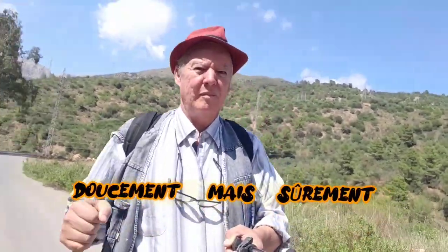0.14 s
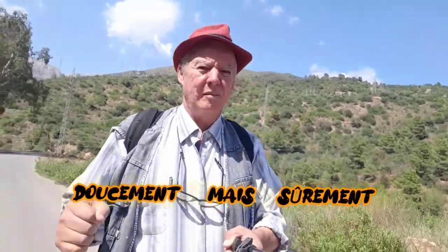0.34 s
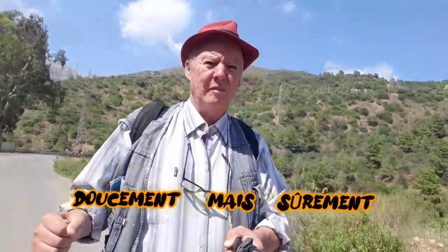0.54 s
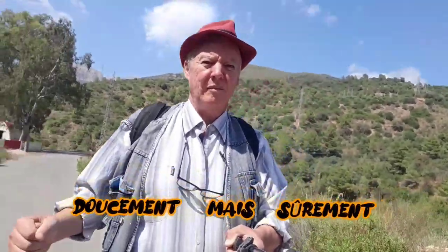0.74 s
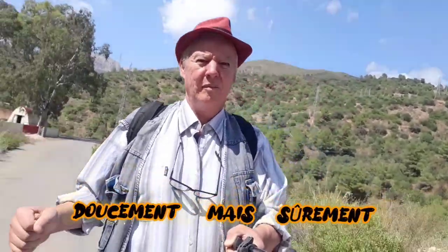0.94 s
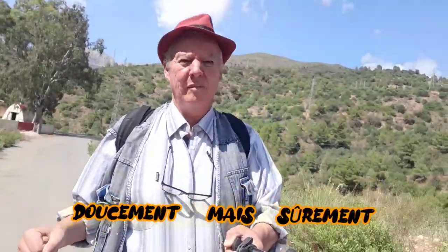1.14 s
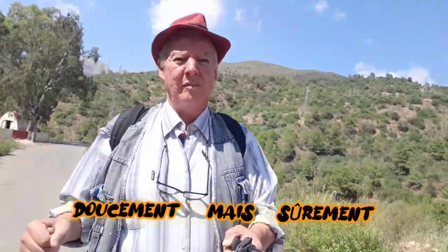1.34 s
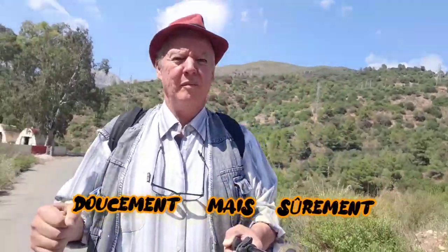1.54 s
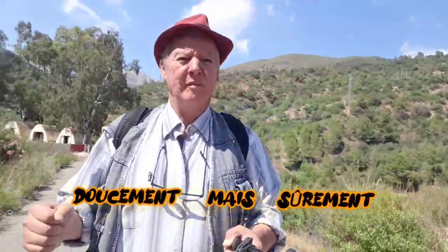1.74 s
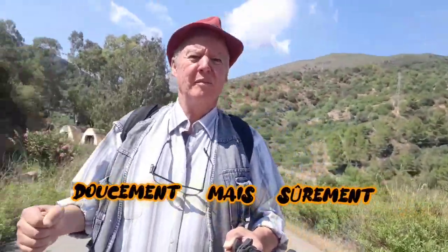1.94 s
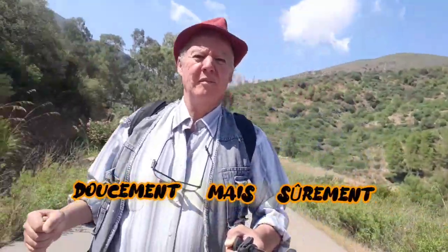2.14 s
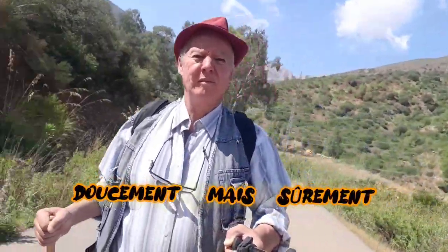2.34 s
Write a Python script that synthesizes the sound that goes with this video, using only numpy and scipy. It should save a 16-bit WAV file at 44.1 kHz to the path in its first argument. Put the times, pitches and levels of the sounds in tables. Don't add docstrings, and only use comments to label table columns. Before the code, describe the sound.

Two hard, gritty walking-stick taps on asphalt, with faint footsteps, wind puffs and a distant engine

```python
import sys
import numpy as np
from scipy import signal
from scipy.fft import rfft, irfft, next_fast_len
from scipy.io import wavfile
from scipy.ndimage import uniform_filter1d, map_coordinates

SR = 44100
rng = np.random.default_rng(int(sys.argv[2]) if len(sys.argv) > 2 else 0)


def wav_record(signal):
    frames = np.transpose(np.atleast_2d(signal))
    bounded = np.clip(frames, -1, 1)
    quanta = np.round(bounded * 32767).astype(np.int16)
    wavfile.write(sys.argv[1], SR, quanta)


def boost(x):
    u = np.asarray(x, float) / 20
    return 10 ** u


N = 110250

# centre in seconds, peak in dB, width in seconds, pitch in Hz.
PUFFS_LEFT = [(0.034, -34, 0.024, 120.6), (0.09, -36.5, 0.067, 103), (0.319, -42, 0.068, 110.7),
              (0.43, -31.5, 0.1, 94), (0.466, -17, 0.092, 104), (0.578, -27.5, 0.046, 115),
              (0.692, -27, 0.06, 104.5), (0.75, -37, 0.0227, 92.7), (0.947, -31, 0.055, 119),
              (1.079, -26.5, 0.036, 104), (1.319, -26.5, 0.11, 116.4), (1.441, -30.5, 0.16, 115),
              (1.493, -26.5, 0.03, 102), (1.535, -32, 0.054, 93.5), (1.728, -25, 0.019, 160),
              (1.887, -22, 0.039, 107), (1.964, -25.5, 0.02, 124), (2.03, -27, 0.048, 93),
              (1.447, -30.5, 0.028, 232)]
# centre in seconds, peak in dB, width in seconds, pitch in Hz.
PUFFS_RIGHT = [(0.284, -28, 0.058, 105.5), (0.389, -34.5, 0.095, 110), (0.537, -52, 0.024, 105.0),
               (0.61, -32, 0.072, 96.6), (0.669, -25.5, 0.046, 90), (0.781, -55.5, 0.022, 105),
               (0.86, -35.5, 0.059, 107), (1.043, -63, 0.041, 107), (1.223, -32, 0.087, 93),
               (1.258, -37, 0.025, 114.0), (1.552, -34.5, 0.177, 100), (1.928, -35.5, 0.058, 104),
               (2.014, -34, 0.044, 101)]
# frequency in Hz, level in dB.
BUFFET_SPECTRUM = [(20, -10), (45, 7), (80, 10.5), (130, -8), (220, -18), (400, -31), (700, -66.5)]
# time in seconds, left level in dB, right level in dB.
BUFFET_LEVELS = [(0, -45, -51), (.5, -39.5, -32), (1.1, -39.5, -46.5), (1.95, -38.5, -43),
                 (2.2, -47.5, -42.5)]
# time in seconds, level in dB, fourth multiple in dB over its mean.
ENGINE_LEVELS = [(0, -48.5, 3), (.3, -43, 1.5), (.7, -44.5, 0.5), (1.1, -47, -8.5), (1.5, -52, 6),
                 (1.62, -58, -3.5), (1.8, -42.5, 3), (2.1, -47, -0.5), (2.5, -47.5, -10)]
# multiple, level in dB, unsteadiness in dB.
ENGINE_ORDERS = [(1, 5.5, 2), (2, -28, -10), (4, -21.5, -0.5)]
# frequency in Hz, density in dB per Hz.
AIR_SPECTRUM = [(200, -5), (330, -9), (620, -26), (2800, -36), (5500, -30.5), (8500, -42.5), (13500, -33),
                (15750, -37.5)]
# frequency in Hz, likeness from 0 to 1.
AIR_LIKENESS = [(200, 0.48), (640, 0.36), (1500, 0.036)]
# start in seconds, length in seconds, first Hz, last Hz, level in dB.
WHISTLES = [(-.01, 0.039, 3240, 2670, -73.5), (0.014, 0.0245, 6210, 3530, -65.5),
            (0.031, 0.026, 3440, 3590, -66), (0.092, 0.037, 3180, 2660, -77),
            (0.294, 0.037, 3400, 4330, -76), (.575, 0.017, 4200, 3950, -77), (.605, 0.015, 3800, 3550, -76),
            (0.955, 0.092, 2620, 4410, -67), (1.091, .045, 3850, 4530, -75.5),
            (1.113, 0.06, 4300, 5450, -75), (1.5, 0.053, 3090, 4570, -67.5),
            (2.399, 0.0592, 2920, 4508, -68.5)]
GLIDE_BENDS = [1.1, .5, 2.1, 1.1, 1.2, 1, 1, 1.9, 2, .39, 1.4, 1.4]
# frequency in Hz, t60 in seconds.
ROADSIDE_DECAY = [(300, 0.47), (2000, 0.379), (8000, 0.38)]
# start in seconds, level in dB, thud in Hz,
# length in seconds.
FOOTFALLS = [(.279, -69, 1010, 0.005), (0.366, -51.5, 486, 0.0023), (0.531, -51, 740, 0.0085),
             (0.962, -51.5, 317.6, 0.021), (1.1803, -40, 280, 0.0032), (1.194, -57, 600, 0.0023),
             (1.813, -53.5, 2460, .003), (1.858, -61, 910, 0.0036), (1.909, -44.5, 320, 0.0044),
             (1.919, -50.5, 414, 0.0067), (1.9193, -43, 815, 0.0017), (2.086, -60.5, 926, 0.0036)]
# frequency in Hz, level in dB.
SCUFF_SPECTRUM = [(250, -2), (800, -4), (2500, -14), (5500, -18.5), (8000, -40), (14000, -37)]
# start in seconds, level in dB, ring in Hz.
STRAP_TICKS = [
    (.7405, -65.5, 7570),
    (0.761, -57.5, 7710),
    (.963, -61, 6420),
    (1.06, -66, 6230),
    (1.097, -65, 7500),
    (1.1808, -53, 1730),
    (1.181, -78, 6200),
    (1.717, -68.5, 7400),
    (1.921, -55.5, 5345),
    (2.216, -68, 6800),
]
# start in seconds, level in dB.
BUCKLE_CLICKS = [
    (0.7608, -52),
    (.964, -60),
    (2.213, -65),
]
# start in seconds, strength in dB, brightness in dB per octave, grit in dB.
TIP_CONTACTS = [
    (.4770, -21, 2.5, -27.5),
    (.4830, -26.5, 0.5, -26),
    (.4872, -24, -1.5, -49),
    (0.4894, -24.5, -2, -44.5),
    (1.762, -28, -2.5, -26),
    (1.7743, -23.5, 2.5, -29),
    (1.7769, -34.5, -2, -26.5),
    (1.7852, -39, -0.5, -41.5),
]
SHAFT_PITCHES = [320, 560, 783, 1265, 1575, 2010, 2410, 2825, 3380, 3800, 4310, 4825, 5410, 6500]
# level in dB, t60 in seconds.
SHAFT_MODES = [(-9.5, 0.092), (-9.5, 0.37), (-8.5, 0.134), (-1, 0.13), (-2, 0.12), (2.5, 0.078),
               (-3.5, 0.0753), (-10, 0.068), (-13, 0.106), (-10, 0.031), (-33, 0.042), (-16.5, 0.0133),
               (-9, 0.01), (-25, .015)]
PLANTED_TIMES = [.494, 1.789]
# frequency in Hz, level in dB.
GRIT_SPECTRUM = [(300, -29), (1500, 17.5), (6000, 7.5), (8000, 7), (16000, -57)]
# start in seconds, level in dB.
STONE_CHIPS = [
    (.4773, -36),
    (.4783, -28),
    (.4806, -36),
    (.4848, -38),
    (1.7607, -34),
    (1.7619, -31),
    (1.7702, -45),
    (1.7748, -35),
    (1.7808, -41),
]
# frequency in Hz, level in dB.
CHIP_SPECTRUM = [(2000, -12), (5000, 0), (7000, -2), (10000, -6), (12500, -13), (16000, -17)]
# centre in seconds, peak in dB, pitch in Hz.
TIP_BLOWS = [
    (.4782, -18, 1900),
    (.4844, -21, 1700),
    (.4885, -14, 1650),
    (.4909, -19, 1800),
    (1.7634, -19, 1300),
    (1.7758, -17, 1900),
    (1.7784, -22, 2200),
    (1.7858, -26, 1500),
]
# time in seconds, level in dB.
ROADSIDE_IMPULSES = [
    (.49, 7.5),
    (1.778, 5.5),
]
# frequency in Hz, level in dB.
ECHO_SPECTRUM = [(400, 4.5), (1400, -2), (3500, -7), (6500, -16), (9000, -12)]
# centre in seconds, level in dB, width in seconds.
CLOTH_SWELLS = [
    (1.0, -73, 0.03),
    (1.53, -72, 0.014),
    (1.67, -72.5, 0.017),
]
# start in seconds, peak in dB, brightness in dB per octave.
GEAR_KNOCKS = [
    (2.444, -33.5, 4.5),
    (2.476, -24.5, 3.5),
]
# frequency in Hz, level in dB, t60 in seconds.
HOLLOW_MODES = [(618, 11.5, 0.026), (906, 8, 0.049), (1180, 7, 0.021), (1577, -2.5, 0.05),
                (2860, -15, 0.023), (2240, -10, 0.029), (3170, -30.5, 0.016), (3950, -19, 0.012)]
# frequency in Hz, level in dB.
PORT_RESPONSE = [(6300, 4), (8000, -14), (12000, -6)]


def unit(x):
    return x / np.sqrt(np.mean(x ** 2) + 1e-20)


def along(points, hz):
    f, v = np.transpose(points)
    return np.interp(np.log(hz + 1), np.log(f + 1), v)


def curves(rows):
    s, *cols = np.transpose(rows)
    return np.array([np.interp(np.arange(N) / SR, s, c) for c in cols])


def wobble(rate):
    knots = rng.standard_normal(int(N * rate / SR) + 4)
    return map_coordinates(knots, [np.arange(N) * rate / SR])


def filtered(x, response):
    m = next_fast_len(x.shape[-1] + 8192)
    return irfft(rfft(x, m) * response(np.fft.rfftfreq(m, 1 / SR)), m)[..., :x.shape[-1]]


def noise(spectrum, size=N):
    return unit(filtered(rng.standard_normal(size), lambda hz: boost(along(spectrum, hz))))


def add(track, s, x):
    i = round(s * SR)
    x = x[max(-i, 0):N - i]
    track[max(i, 0):][:len(x)] += x


def placed(x, lead_s, pan_db):
    side = np.array([[.5], [-.5]])
    return filtered(x, lambda hz: boost(side * pan_db) * np.exp(2j * np.pi * hz * side * lead_s))


def rung(modes, tilt_db, t):
    out = 0
    for hz, db, t60 in modes:
        level_db = db + tilt_db * np.log2(hz / 1000) + rng.normal(0, 1.5)
        out = out + boost(level_db - 60 * t / t60) * np.sin(2 * np.pi * hz * t)
    return out


def wind():
    sharpness, noise_db, pitch_sag = 0.17, -1.5, 0.41
    out, t = np.zeros((2, N)), np.arange(-SR // 8, SR // 8) / SR
    for port, puffs in zip(out, (PUFFS_LEFT, PUFFS_RIGHT)):
        for s, db, width, hz in puffs:
            cycles = hz * t * (1 - pitch_sag * t / width) + rng.random()
            body = np.cos(2 * np.pi * cycles) + boost(noise_db) * noise(BUFFET_SPECTRUM, size=len(t))
            swell = np.exp(-.5 * (t / (sharpness * width)) ** 2)
            add(port, s + t[0], boost(db) * swell * body)
    lumps = np.array([unit(boost(5.24 * wobble(16)) * noise(BUFFET_SPECTRUM)) for _ in out])
    return out + boost(curves(BUFFET_LEVELS)) * lumps


def engine():
    firing_hz, pan_db = 76.84, -3
    level_db, fourth_db = curves(ENGINE_LEVELS)
    phase = 2 * np.pi * np.cumsum(firing_hz + .5 * wobble(2.66)) / SR
    tones = 0
    for k, db, shake_db in ENGINE_ORDERS:
        strength = boost(db + (k == 4) * fourth_db + shake_db * wobble(22.3))
        tones = tones + strength * np.sin(k * phase + 0.13 * k * wobble(18))
    return placed(np.sqrt(2) * boost(level_db) * tones, 0, pan_db)


def air():
    level_db, top_hz = -63.5, 15800
    z = signal.stft(rng.standard_normal((2, N)), nperseg=512)[2]
    patches = uniform_filter1d(rng.standard_normal(z.shape[1:]), size=12, axis=0)
    patches = uniform_filter1d(patches, size=10, axis=1)
    pair = signal.istft(z * boost(1.5 * unit(patches)), nperseg=512)[1][:, :N]

    def mid_side(hz):
        angle = np.arccos(np.clip(along(AIR_LIKENESS, hz), 0, 1)) / 2
        return boost(along(AIR_SPECTRUM, hz)) * (hz < top_hz) * [np.cos(angle), np.sin(angle)]

    mid, side = filtered(pair, mid_side)
    return boost(level_db + 5 + 0.077 * wobble(1.9)) * unit(np.array([mid + side, mid - side]))


def birds():
    out = np.zeros(N)
    for (s, length, first_hz, last_hz, db), bend in zip(WHISTLES, GLIDE_BENDS):
        u = np.arange(round(length * SR)) / (length * SR)
        glide = u ** bend - (bend < .4) * 0.64 * u ** 4
        phase = 2 * np.pi * np.cumsum(first_hz + (last_hz - first_hz) * glide) / SR
        swell = np.abs(np.sin(np.pi * u ** 1.54)) ** 0.79
        add(out, s, boost(db) * swell * boost(2.9 * wobble(126)[:len(u)]) * np.sin(phase))
    return out


def echo(x):
    hz, t, z = signal.stft(rng.standard_normal((2, SR // 3)), SR, nperseg=256)
    decay = boost(-60 * t / along(ROADSIDE_DECAY, hz)[:, None])
    tail = signal.istft(z * decay, SR, nperseg=256)[1]
    late = np.pad(x, (100, 0))[None]
    return signal.fftconvolve(late, tail / np.linalg.norm(tail[0]), axes=1)[:, :N]


def steps():
    scuff_db, scuff_t60, scratch_db = -21, 0.46, -7
    tick_t60, snap_t60, snap_db = .012, .006, -3
    snap_spectrum = [(3000, -27), (6000, 14), (16000, -10)]  # (Hz, dB)
    click_spectrum = [(4000, -30), (5500, -7), (9000, -3), (16000, -6)]  # (Hz, dB)
    out, t = np.zeros(N), np.arange(SR // 4) / SR
    for s, db, hz, length in FOOTFALLS:
        thud = np.sin(2 * np.pi * hz * t) * 2 * t / length * np.exp(1 - 2 * t / length)
        friction = boost(scuff_db - 60 * t / scuff_t60) + boost(scratch_db - 20 * t / length)
        add(out, s, boost(db) * (thud + friction * noise(SCUFF_SPECTRUM, size=len(t))))
    for s, db, hz in STRAP_TICKS:
        size = hz / 7700
        snap = boost(snap_db * size - 60 * t / snap_t60) * size * noise(snap_spectrum, size=len(t))
        add(out, s, boost(db) * (boost(-60 * t / tick_t60) * np.sin(2 * np.pi * hz * t) + snap))
    for s, db in BUCKLE_CLICKS:
        add(out, s, boost(db - 60 * t / 0.0072) * noise(click_spectrum, size=len(t)))
    return out


def stick():
    travel_s, shaft_top_hz = 0.002059, 8600
    ring_cycles, planted_t60 = 140, 0.024
    grit_gain_db, grit_t60, chip_t60 = 2.1, 0.021, .007
    ring, grit, t = np.zeros(N), np.zeros(N), np.arange(SR // 5) / SR
    modes = [(hz, db, min(t60, ring_cycles / hz)) for hz, (db, t60) in zip(SHAFT_PITCHES, SHAFT_MODES)]
    for s, db, tilt_db, grit_db in TIP_CONTACTS:
        planted = min(p for p in PLANTED_TIMES if p > s - .01) - s
        stilled_db = 60 * np.clip(t - planted, 0, 1) / planted_t60
        add(ring, s, boost(db - 7.5 - stilled_db) * rung(modes, tilt_db, t))
        crack = boost(grit_db + grit_gain_db - 60 * t / grit_t60) * noise(GRIT_SPECTRUM, size=len(t))
        add(grit, s, crack * (1 - np.exp(-t / 0.00075)))
    for s, db in STONE_CHIPS:
        add(grit, s, boost(db - 60 * t / chip_t60) * noise(CHIP_SPECTRUM, size=len(t)))

    def shaft(hz):
        bending = -4j * np.pi * travel_s * np.sqrt(1000 * hz)
        travel = np.exp(bending + 2j * np.pi * hz * travel_s / 3)
        return travel / (1 + (hz / shaft_top_hz) ** 10)

    return filtered(ring, shaft) + grit


def blows():
    pulse_s = .00035
    near, far, t = np.zeros(N), np.zeros(N), np.arange(-99, 100) / SR
    for s, db, hz in TIP_BLOWS:
        add(near, s + t[0], boost(db) * np.exp(-.5 * (t / pulse_s) ** 2) * np.cos(2 * np.pi * hz * t))
    for s, db in ROADSIDE_IMPULSES:
        add(far, s, boost([db]))
    return near, filtered(far, lambda hz: boost(along(ECHO_SPECTRUM, hz)))


def rustle():
    t = np.arange(N) / SR
    swell = sum(boost(db) * np.exp(-.5 * ((t - s) / width) ** 2) for s, db, width in CLOTH_SWELLS)
    cloth_spectrum = [(3800, -77), (5000, -11), (6000, -2), (7500, -18.5)]  # (Hz, dB)
    return swell * np.array([noise(cloth_spectrum) for _ in range(2)])


def knocks():
    out, t = np.zeros(N), np.arange(SR // 5) / SR
    for s, db, tilt_db in GEAR_KNOCKS:
        add(out, s, boost(db - 16.5) * rung(HOLLOW_MODES, tilt_db, t) * (1 - np.exp(-t / 0.0014)))
        contact_db = db - 32.5 + 2 * tilt_db - 60 * t / 0.034
        add(out, s, boost(contact_db) * noise(GRIT_SPECTRUM, size=len(t)))
    return out


def scene():
    stick_lead_s, stick_pan_db, echo_db = .00024, -1.1, -20.5
    tap, knock, feet, song = stick(), knocks(), steps(), birds()
    blow, far = blows()
    taps = placed(tap + blow, stick_lead_s, stick_pan_db) + placed(knock, stick_lead_s, 0.7)
    taps = taps + boost(echo_db) * echo(far + knock + feet)
    near = filtered(taps, lambda hz: boost(along(PORT_RESPONSE, hz))) + placed(feet, .00015, -5.0)
    whistles = placed(song, -0.00019, -12.5) + boost(-3) * echo(song)
    return near + whistles + engine() + wind() + air() + rustle()


def low_pass(x):
    return signal.sosfilt(signal.butter(12, 16640, fs=SR, output="sos"), x)


def record(dry):
    low_cut_hz, top_hz = 40, 16400
    cut = lambda hz: (hz < top_hz) * (1j * hz / (low_cut_hz + 1j * hz)) ** 2
    padded = np.pad(dry, ((0, 0), (0, 999)), "reflect")
    return low_pass(filtered(padded, cut)[:, :N])


dry = scene()
out = record(dry)
wav_record(out)
```